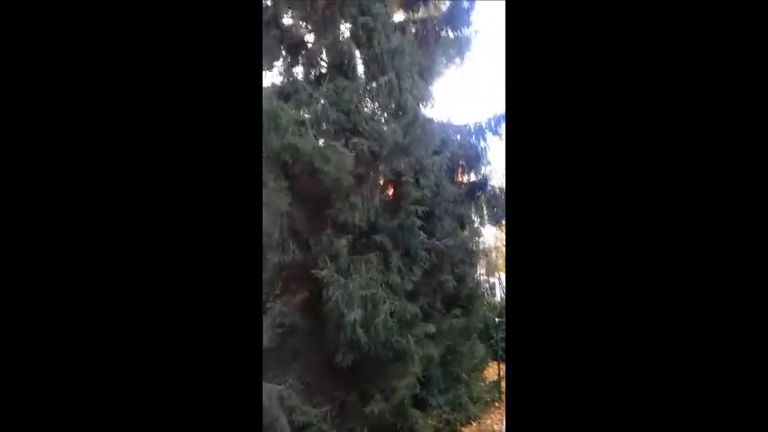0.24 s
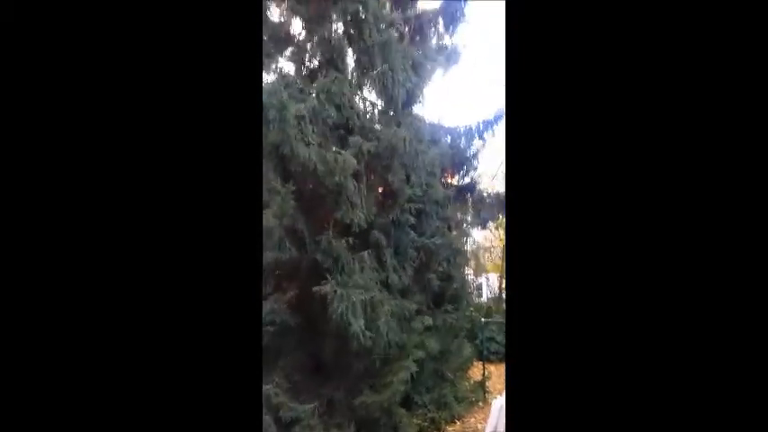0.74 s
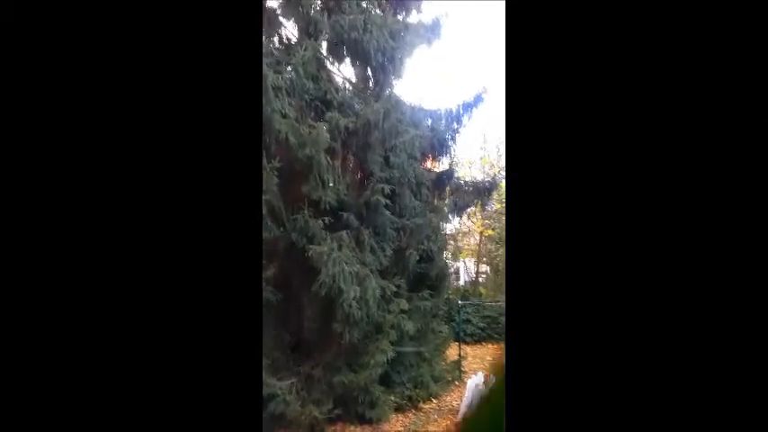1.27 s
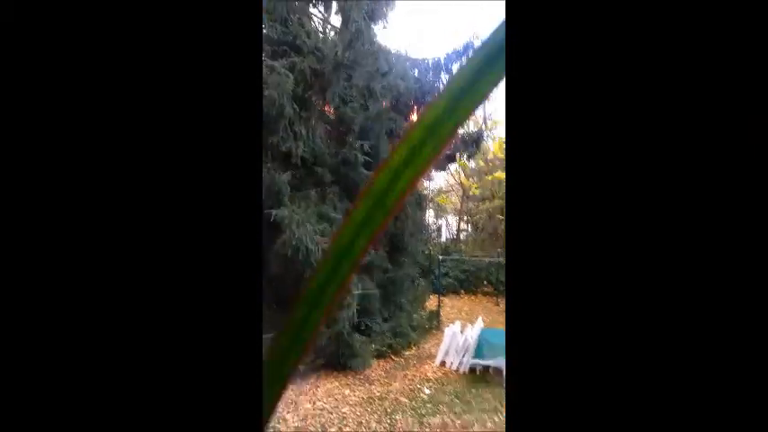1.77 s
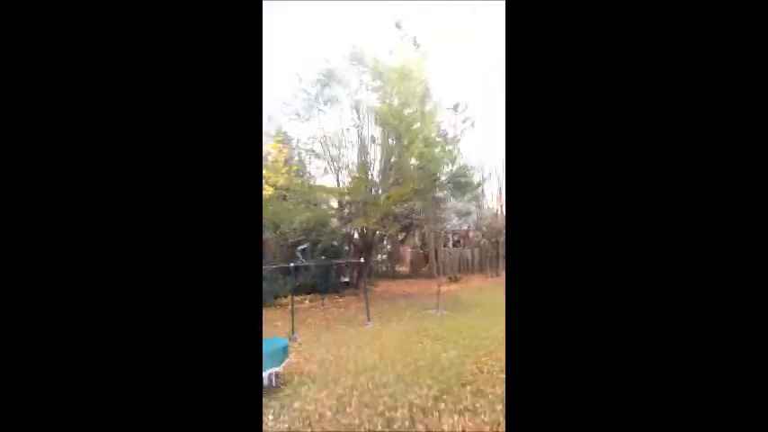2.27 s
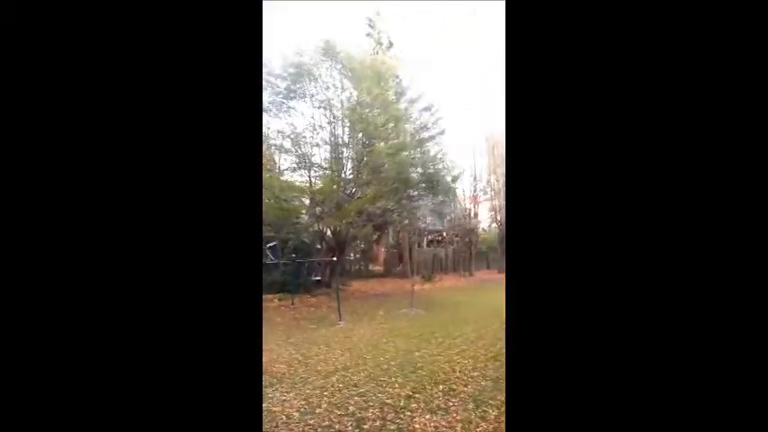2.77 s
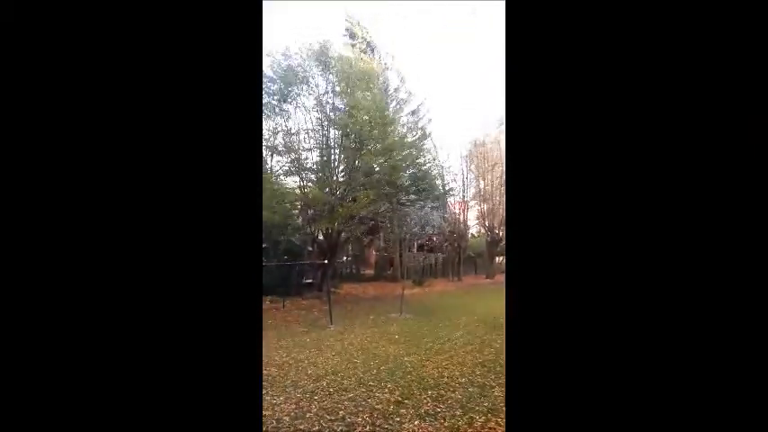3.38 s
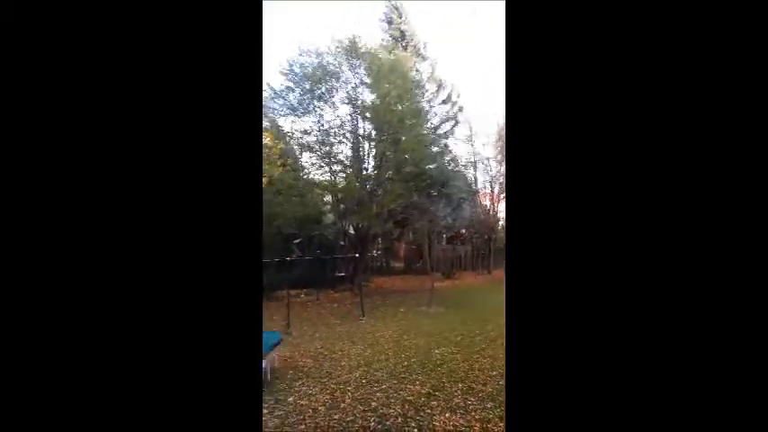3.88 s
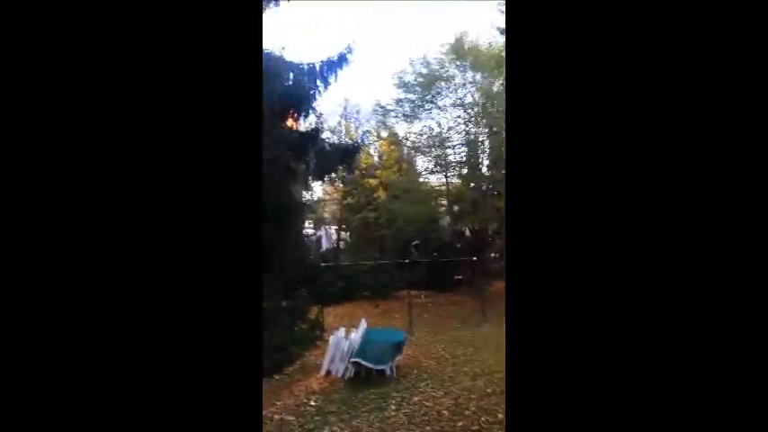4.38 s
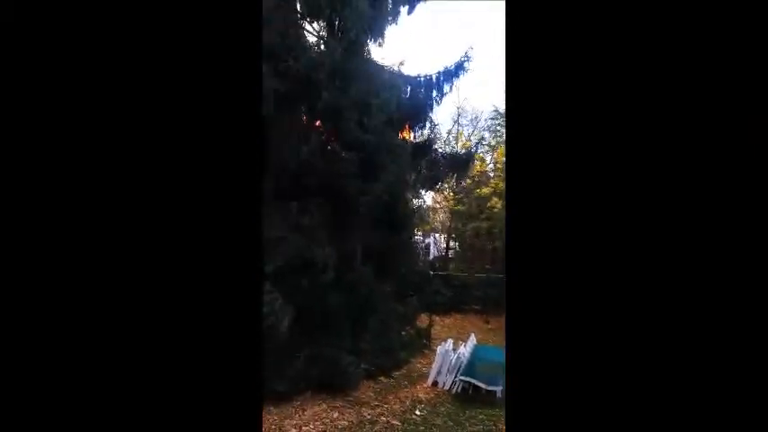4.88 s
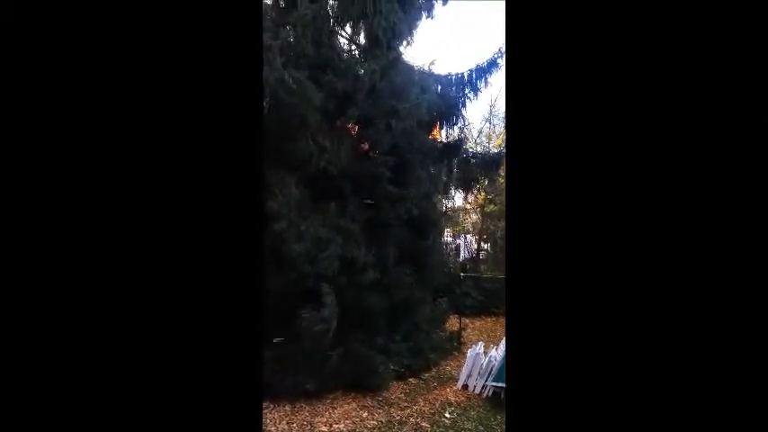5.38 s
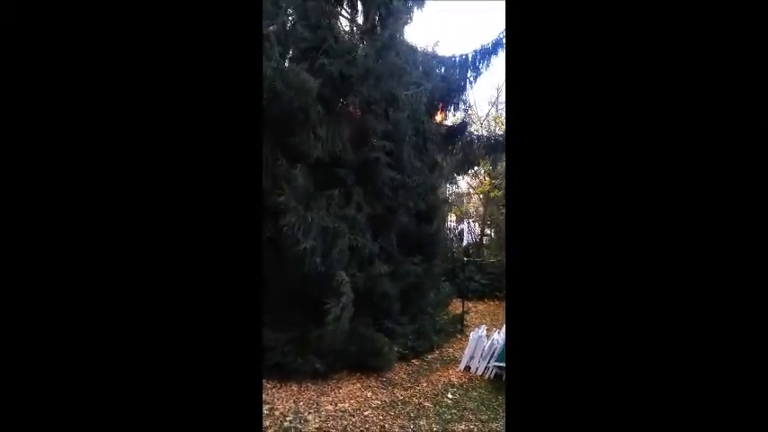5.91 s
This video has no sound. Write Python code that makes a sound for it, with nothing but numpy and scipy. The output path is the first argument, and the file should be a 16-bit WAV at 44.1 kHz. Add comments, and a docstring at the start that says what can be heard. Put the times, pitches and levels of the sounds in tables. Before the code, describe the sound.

Sheltered wind in garden trees and a few close knocks give way abruptly to strong gusts and thumping microphone wind noise.

```python
"""Storm wind in garden conifers

Wind rushes through the needles of tall conifers, heard from a hand-held camera. At first the house
shelters it, and clacks, scrapes and snaps sound close by as it passes a stiff plant. Then, abruptly,
it is out in the open: the trees roar, and eddies buffet and overload its two microphone ports."""
import sys
import numpy as np
from scipy import signal
from scipy.fft import rfft, irfft, next_fast_len
from scipy.io import wavfile
from scipy.ndimage import uniform_filter1d

SR = 44100
rng = np.random.default_rng(int(sys.argv[2]) if len(sys.argv) > 2 else 0)


def wrap_up_sound(samples):
    """Save the sound to the file named by the first command line argument, as 16-bit audio."""
    columns = np.atleast_2d(samples).T
    # keep every value between -1 and 1, then stretch to whole-number steps
    tamed = np.clip(columns, -1, 1)
    steps = np.round(tamed * 32767).astype(np.int16)
    wavfile.write(sys.argv[1], SR, steps)


N = 271170
T = np.arange(N) / SR

# Heard level of the sheltered wind, dropping around the close knocks: time_s, fader_db
SHELTERED_FADER = [(0.0, -31), (0.67, -32), (1.36, -31), (1.54, -33), (1.81, -37), (2.1, -37.5),
                   (2.3, -39.5)]
# Heard level of the trees in the open: gusts, plus drawn-in ducking after heavy buffets:
# time_s, fader_db
OPEN_FADER = [(2.32, -28.5), (2.38, -30), (2.5, -31.5), (2.57, -26), (2.66, -29), (2.71, -24.5),
              (3.15, -24.5), (3.33, -24.5), (3.63, -30.5), (3.69, -27.5), (3.82, -23.5), (3.95, -27),
              (4.0, -24.5), (4.1, -29), (4.19, -21), (4.32, -25.5), (4.45, -20.5), (4.65, -26), (4.87, -22),
              (5.08, -24.5), (5.18, -21.5), (5.4, -23), (5.52, -28), (5.92, -20), (6.05, -23.5),
              (6.14, -19)]
# Tone of the trees in each place: frequency_hz, gain_db
SHELTERED_TONE = [(25, -25), (80, -28), (170, -3), (260, 2), (440, -3.5), (600, 1.5), (950, -9),
                  (1400, -3.5), (2000, -8.5), (3200, -12), (5500, -20.5), (9000, -28), (12000, -37.5),
                  (15000, -58)]
OPEN_TONE = [(25, -45), (80, -19), (190, -1), (380, 1), (620, 0), (950, -9), (1400, -6.5), (2000, -7.5),
             (3200, -8.5), (5200, -14.5), (8000, -20), (10500, -25), (12500, -34), (15000, -55)]
# Stereo image of the trees, centred low down and wide on top: frequency_hz, correlation
TREE_CORRELATION = [(60, 0.69), (200, 0.97), (600, 0.85), (900, 0.53), (1250, 0.052), (1900, -0.11),
                    (2600, -0.061), (4000, 0.023), (8000, 0.0092)]
# Time the house echo takes to fall 60 dB: frequency_hz, decay_s
WALL_DECAY = [(200, 0.57), (2000, 0.26), (6000, 0.25), (14000, 0.16)]
# Fixed peaks and dips of the cavity behind each microphone port: centre_hz, width_hz, gain_db
LEFT_PORT = [(944, 224, 4.5), (1575, 870, 6), (2040, 190, -3), (2740, 530, 6.5), (4050, 560, -2.5),
             (5080, 560, 5.5), (6900, 2300, 2.5), (10000, 12600, -4.5)]
RIGHT_PORT = [(713, 99, -4.5), (1450, 270, -3.5), (2070, 350, 1.3)]
# Main ring of the left cavity, shifting with the grip: time_s, pitch_hz, gain_db
GRIP_RING = [(0, 1490, -4.5), (1.38, 1600, -8), (1.7, 1520, 3.5), (1.85, 1450, 1.5), (2.02, 1310, -12),
             (2.25, 1300, 1), (2.4, 1590, 4), (3.6, 1600, -0.5), (5.0, 1626, 0), (6.1, 1710, -9)]
# Close knocks, ticks and scrapes:
# start_s, length_s, level_db, left_over_right_db, tilt_db_per_octave, ring_hz, thud_db
KNOCKS = [(0.9101, 0.0014, -12, 4.5, -4.5, 1200, -36), (1.2712, 0.0095, -17, 0.5, -0.5, 2490, -23),
          (1.3635, 0.0043, -12.5, 1, -2, 1550, -20.5), (1.38, 0.011, -17, -6, -5, 1570, -27),
          (1.493, 0.0016, -32, -9, 13, 9000, -58), (1.533, 0.0021, -36, -4, 13, 9000, -53),
          (1.733, 0.0099, -38, 9, -5, 2800, -60), (1.8146, 0.0029, -16.5, 1, -5.5, 740, -40),
          (1.852, 0.0074, -20.5, 0, -6, 1200, -27), (1.867, 0.037, -30, 3, -4.5, 515, -41),
          (1.933, 0.012, -32.5, 3, -5, 990, -60), (1.982, 0.016, -22, 2, -2.5, 1250, -45),
          (2.004, 0.061, -23.5, -0.5, -4.5, 1430, -48), (2.059, 0.069, -43.5, -1, 0, 1100, -60),
          (2.978, 0.0021, -16.5, 6, 6, 8000, -58), (5.431, 0.0029, -6, 5, -4.5, 1140, -44)]
# Sharp, close snaps: start_s, level_db, left_over_right_db
SNAPS = [(1.8509, -5.5, 2), (1.959, -6, 1)]
# Tone of a clack and of a snap: frequency_hz, gain_db
CLACK_TONE = [(40, -16), (150, -19), (450, 9), (900, 4.5), (2500, 2), (4000, 5.5), (5500, 0), (9000, -9),
              (15000, -13)]
SNAP_TONE = [(100, -27), (600, -9), (1500, -2), (2600, 2.5), (4000, 0.5), (7000, 4), (10000, 0.5),
             (14500, 1.5)]
# Rings a snap excites at the left port: centre_hz, width_hz, gain_db
SNAP_RINGS = [(5250, 520, 8), (6200, 690, 8.5)]
# Light turbulence at the ports: time_s, left_db, right_db
TURBULENCE = [(2.3, -46, -46), (2.9, -38, -30.5), (3.6, -29, -36.5), (4.1, -31.5, -35), (4.3, -23, -27),
              (4.45, -24, -25), (4.8, -25, -18.5), (5.08, -37, -35), (5.6, -30, -48), (5.9, -37, -22),
              (6.14, -32, -29)]
# Strong eddies hitting a port: start_s, length_s, level_db, corner_hz, side (-1 left, 1 right)
BUFFETS = [(2.337, .022, -9, 367, -1), (2.85, 0.044, -19, 258, 1), (2.929, .028, -20.5, 280, -1),
           (3.08, .016, -6.5, 423, 1), (3.124, 0.024, -8, 380, 1), (3.461, 0.015, -9, 750, -1),
           (3.472, 0.019, -3.5, 716, -1), (3.488, 0.024, -3.5, 564, -1), (3.511, 0.017, -9, 450, -1),
           (3.537, .016, -5, 340, -1), (3.556, 0.038, -5, 466, -1), (3.594, 0.024, -7.5, 330, -1),
           (3.608, 0.031, -8, 595, -1), (3.674, 0.015, -9, 355, -1), (3.755, 0.028, -13.5, 333, -1),
           (3.809, 0.014, -12.5, 320, -1), (4.3753, 0.0072, 3.5, 716, 1), (4.39, 0.018, -14, 300, 1),
           (4.395, .016, -14, 300, -1), (4.489, 0.016, -10, 378, 1), (4.515, .013, -14, 350, -1),
           (4.519, .01, -10, 340, 1), (4.552, 0.019, -11, 330, -1), (4.589, 0.015, -6, 480, -1),
           (4.683, 0.006, -3, 475, 1), (4.695, 0.016, -7.5, 330, 1), (4.723, .018, -9.5, 400, 1),
           (4.85, 0.016, -14.5, 353, -1), (4.884, 0.0087, -6, 800, -1), (5.133, 0.053, -12.5, 340, 1),
           (5.216, 0.0087, 3, 645, 1), (5.227, .012, 4, 673, 1), (5.241, 0.029, -4, 420, 1),
           (5.288, 0.0075, -4, 500, 1), (5.301, 0.013, -1.5, 370, 1), (5.381, 0.022, -5.5, 420, 1),
           (5.415, 0.02, -9, 340, 1), (5.43, 0.0082, 1, 680, -1), (5.469, 0.01, -12, 380, -1),
           (5.476, 0.0074, -5.5, 420, 1), (5.483, .014, -3.5, 600, 1), (5.556, 0.0084, -10, 755, -1),
           (5.701, 0.014, -13.5, 300, 1), (5.712, 0.018, -5.5, 423, 1), (5.782, 0.013, -8.5, 320, 1),
           (5.802, 0.027, -9.5, 338, 1), (5.982, .02, -5, 433, 1), (6.004, 0.01, -1.5, 650, 1),
           (6.023, 0.014, 5, 564, 1), (6.079, 0.032, -9, 330, 1), (6.114, 0.0082, -7, 850, 1)]


def gain_of(db):
    """Decibels to amplitude."""
    return 10 ** (np.asarray(db) / 20)


def panned(db, pan_db):
    """Left and right gains, pan_db apart."""
    return gain_of([[db + pan_db / 2], [db - pan_db / 2]])


def unit_rms(x):
    """Scales to an rms of one."""
    return x / np.sqrt(np.mean(x ** 2) + 1e-20)


def curve_at(points, hz):
    """Reads a table along a log-frequency axis."""
    f, value = np.transpose(points)
    return np.interp(np.log(hz + 1), np.log(f + 1), value)


def bells(table, hz):
    """The dB curve of a few bell-shaped peaks and dips."""
    return sum(db * np.exp(-2 * ((hz - f) / width) ** 2) for f, width, db in table)


def add(mix, s, sound):
    """Lays a sound into the mix at time s."""
    part = mix[..., max(round(s * SR), 0):][..., :sound.shape[-1]]
    part += sound[..., :part.shape[-1]]


def eq(x, curve):
    """Filters x by a dB curve, given as a function of frequency."""
    size = next_fast_len(x.shape[-1])
    gain = gain_of(curve(np.fft.rfftfreq(size, 1 / SR)))
    return irfft(rfft(x, size) * gain, size)[..., :x.shape[-1]]


def resonate(x, hz, width_hz):
    """A resonance of gain one that follows the curve hz."""
    turn = np.exp(2j * np.pi * np.cumsum(hz) / SR)
    pole = np.exp(-np.pi * width_hz / SR)
    return 2 * (turn * signal.lfilter([1 - pole], [1, -pole], x / turn)).real


def smoothed(noise, *sizes):
    """Blurs noise by one size per axis into a modulator of rms one."""
    for axis, size in enumerate(sizes):
        noise = uniform_filter1d(noise, size, axis=axis)
    return unit_rms(noise)


def wander(shape, per_s):
    """Random drift of rms one that changes about per_s times a second."""
    return unit_rms(eq(rng.standard_normal(shape), lambda hz: -10 * np.log10(1 + (hz / per_s) ** 6)))


def trees(fader, tone, trim_db, patchy_db, flutter_db, sway_db, roar, rush, hiss):
    """Countless needles shed eddies: a wide bed of noise in which single boughs swell and fade."""
    frames, hz = N // 256 + 5, np.fft.rfftfreq(1024, 1 / SR)
    s, fader_db = np.transpose(fader)
    ride_db = np.interp(np.arange(frames) * 256 / SR, s, fader_db - fader_db.mean())[:, None]
    noise = rng.standard_normal((6, frames, 513))
    boughs, flutter = smoothed(noise[4], 16, 12), smoothed(noise[5], 4, 120)
    sway = smoothed(uniform_filter1d(rng.standard_normal(frames), size=14), 8)[:, None]
    shared = curve_at(TREE_CORRELATION, hz)
    left = noise[0] + 1j * noise[1]
    right = shared * left + np.sqrt(1 - shared ** 2) * (noise[2] + 1j * noise[3])
    # The roar of far trees, rush of boughs and hiss of needles each follow the fader by their own share.
    follows = curve_at([(500, roar), (2000, rush), (7000, hiss)], hz)
    shape_db = curve_at(tone, hz) + follows * (ride_db + sway_db * sway)
    spectra = np.array([left, right]) * gain_of(shape_db + patchy_db * boughs + flutter_db * flutter)
    bed = signal.istft(spectra.swapaxes(1, 2), nperseg=1024, noverlap=768)[1][:, :N]
    return gain_of(trim_db + fader_db.mean()) * unit_rms(bed)


def house_echo(x, tilt_db_per_octave=-0.3):
    """The house throws back a short diffuse tail, treble dying first."""
    taps = rng.standard_normal((2, SR // 2)) * (rng.random((2, SR // 2)) < 0.1)
    hz, t, spectra = signal.stft(taps, SR, nperseg=256)
    decay = gain_of(-60 * t / curve_at(WALL_DECAY, hz)[:, None])
    tail = signal.istft(spectra * decay, SR, nperseg=256)[1]
    tail = eq(tail / np.linalg.norm(tail[0]), lambda hz: tilt_db_per_octave * np.log2((hz + 500) / 3000))
    return signal.fftconvolve(x, tail, axes=1)[:, :N]


def port_cavities(x):
    """Sound reaches each capsule through a small cavity; the left one rings."""
    left = eq(x[0], lambda hz: bells(LEFT_PORT, hz))
    right = eq(x[1], lambda hz: bells(RIGHT_PORT, hz))
    s, ring_hz, ring_db = np.transpose(GRIP_RING)
    ring = resonate(left, np.interp(T, s, ring_hz), width_hz=174)
    return np.array([left + gain_of(np.interp(T, s, ring_db)) * ring, right])


def thuds(pitch_hz=225, decay_s=0.0041):
    """The camera body answers each knock with a few dull swings."""
    out, t = np.zeros((2, N)), np.arange(4096) / SR
    thud = np.sin(2 * np.pi * pitch_hz * t) * t / decay_s * np.exp(1 - t / decay_s)
    for s, *_, thud_db in KNOCKS:
        add(out, s, gain_of(thud_db) * thud)
    return out


def clacks(fall_s=0.0033, grain_db=3.0, shared=0.23, hollow_db=10.0, hollow_octaves=0.099):
    """Each contact is a short run of tiny slips with one hollow resonance and a fast release."""
    out, t = np.zeros((2, N)), np.arange(4096) / SR
    for s, length, db, pan_db, tilt_db, ring_hz, _ in KNOCKS:
        noise = rng.standard_normal((4, len(t)))
        grain = gain_of(grain_db * smoothed(noise[3], 40))
        slips = (shared * noise[2] + (1 - shared) * noise[:2]) * grain
        slips = eq(slips, lambda hz: curve_at(CLACK_TONE, hz) + tilt_db * np.log2((hz + 500) / 2000))
        slips = eq(slips, lambda hz: hollow_db / (1 + (np.log2((hz + 1) / ring_hz) / hollow_octaves) ** 2))
        attack = np.minimum(t / (0.072 * length), 1)
        stroke = slips * attack * np.exp(-np.maximum(t - 0.57 * length, 0) / fall_s)
        stroke /= np.sqrt(np.sum(stroke ** 2) / (2 * length * SR))
        add(out, s, stroke * panned(db, pan_db))
    return out


def snaps(lead_s=0.0056, catch_db=-12, rise_s=0.0025, hold_s=0.0015, fall_s=0.0039, grain_db=1.0):
    """Each snap is a faint catch, then a bright release that rings the left port; the house echoes it."""
    out, t = np.zeros((2, N)), np.arange(4096) / SR
    catch = gain_of(catch_db) * np.exp(-t / fall_s)
    since = t - lead_s
    release = np.clip(since / rise_s, 0, 1) * np.exp(-np.maximum(since - rise_s - hold_s, 0) / fall_s)
    for s, db, pan_db in SNAPS:
        noise = rng.standard_normal((3, len(t)))
        grain = gain_of(grain_db * smoothed(noise[2], 30))
        slips = unit_rms(eq(noise[:2], lambda hz: curve_at(SNAP_TONE, hz)) * grain)
        add(out, s - lead_s, slips * (catch + release) * panned(db, pan_db))
    direct = np.array([eq(out[0], lambda hz: bells(SNAP_RINGS, hz)), out[1]])
    return direct + gain_of(-8) * house_echo(out)


def eddy_tone(hz, corner_hz, low_cut_hz, crackle_db):
    """Turbulence rolls off above a corner, where tiny eddies crackle; the microphone sheds the bass."""
    swirl = 1 / (1 + (hz / corner_hz) ** 6.9)
    crackle = gain_of(crackle_db) ** 2 / (1 + (hz / (4 * corner_hz)) ** 6)
    return 10 * np.log10(swirl + crackle) - 10 * np.log10(1 + (low_cut_hz / (hz + 15)) ** 6)


def rumble(lumpy_db=5.0, wake_db=-16.5, build_s=0.014, wake_s=0.035):
    """Light turbulence flutters at each port and swells around the buffets, gluing them together."""
    s, *port_db = np.transpose(TURBULENCE)
    power = gain_of([np.interp(T, s, db) for db in port_db]) ** 2
    for start, length, db, _, side in BUFFETS:
        away = np.clip(np.maximum((start - T) / build_s, (T - start - length) / wake_s), 0, 20)
        power[int(side > 0)] += gain_of(db + wake_db) ** 2 * np.exp(-2 * away)
    noise = rng.standard_normal((2, N))
    churn = eq(noise, lambda hz: eddy_tone(hz, corner_hz=330, low_cut_hz=198, crackle_db=-21))
    return np.sqrt(power) * unit_rms(churn * gain_of(lumpy_db * wander((2, N), per_s=12.4)))


def buffets(trim_db=-0.5, bass_cut_hz=88, sag_db=3.0, ragged_db=3):
    """Each strong eddy strikes one port alone, sputters and sags."""
    out = np.zeros((2, N))
    noises = rng.standard_normal((len(BUFFETS), 8192))
    for (s, length, db, corner_hz, side), noise in zip(BUFFETS, noises):
        size = round(length * SR)
        sputter = noise * gain_of(ragged_db * wander(noise.shape, per_s=70))
        churn = eq(sputter, lambda hz: eddy_tone(hz, corner_hz, low_cut_hz=180, crackle_db=-23.5))
        push = signal.windows.tukey(size, 0.25) * gain_of(-sag_db * np.linspace(0, 1, size))
        add(out[int(side > 0)], s, gain_of(db + trim_db) * unit_rms(churn[:size] * push))
    return eq(out, lambda hz: -10 * np.log10(1 + (bass_cut_hz / (hz + 15)) ** 4))


def scene(open_at_s=2.3148, mic_hiss_db=-61):
    """Sheltered wind and close clacks, then a hard cut to the open storm and its buffets."""
    in_open = np.clip((T - open_at_s) / 0.0004, 0, 1)
    sheltered = trees(SHELTERED_FADER, SHELTERED_TONE, trim_db=-0.5, patchy_db=-0.03, flutter_db=0.38,
                      sway_db=-0.14, roar=1.73, rush=0.46, hiss=1.0)
    storm = trees(OPEN_FADER, OPEN_TONE, trim_db=5.5, patchy_db=0.33, flutter_db=0.72,
                  sway_db=0.4, roar=0.46, rush=0.81, hiss=0.75)
    bed = (1 - in_open) * sheltered + in_open * storm
    knocks = clacks() + thuds()
    air = bed + knocks + gain_of(-7.5) * house_echo(knocks) + snaps()
    blows = in_open * rumble() + buffets()
    return port_cavities(air) + blows + gain_of(mic_hiss_db) * rng.standard_normal((2, N))


def record(dry, threshold_db=-11, squeeze=0.22, recovery_db_per_s=85, attack_s=0.01, top_hz=15000):
    """Gain control ducks both channels after a blow, the peaks clip, and a low-pass trims the top."""
    power = abs(uniform_filter1d(dry ** 2, size=300, axis=1)).max(0)
    power_db = 10 * np.log10(power + 1e-12)
    fall_db = T * recovery_db_per_s
    held_db = np.maximum.accumulate(power_db + fall_db) - fall_db
    over_db = np.maximum(held_db - threshold_db, 0)
    lag = np.exp(-1 / (attack_s * SR))
    duck_db = squeeze * signal.lfilter([1 - lag], [1, -lag], over_db)
    clipped = np.clip(dry / gain_of(duck_db), -1, 1)
    low_pass = signal.firwin(255, top_hz, window=("kaiser", 7), fs=SR)
    return signal.oaconvolve(clipped, low_pass[None], "same")


dry = scene()
out = record(dry)
wrap_up_sound(out)
```